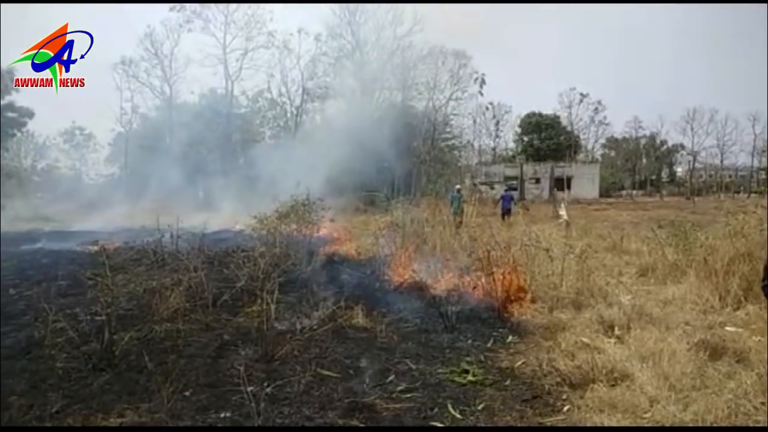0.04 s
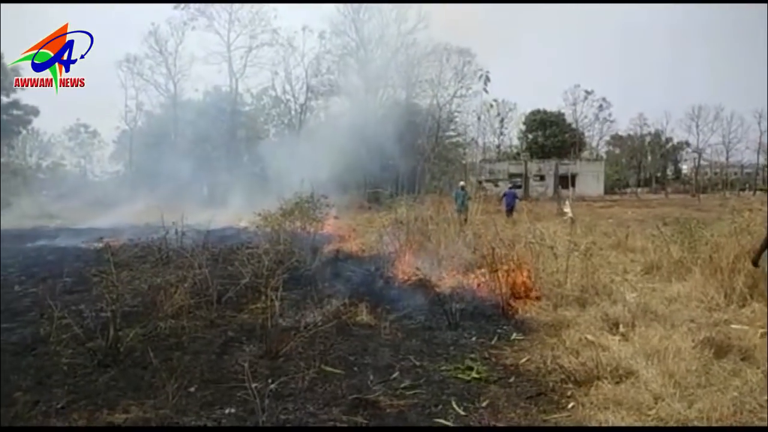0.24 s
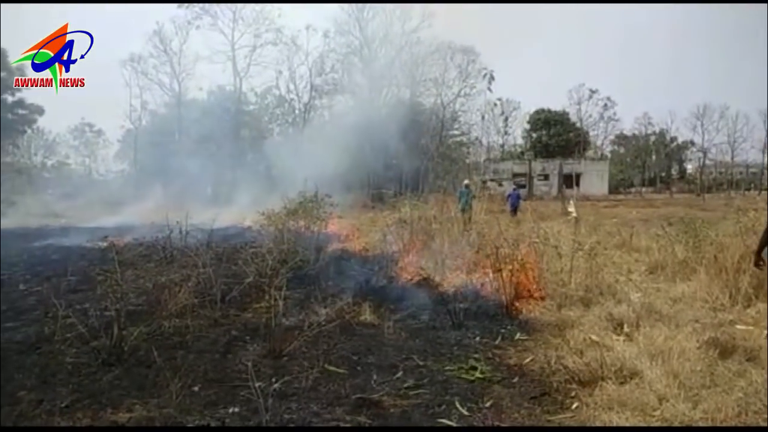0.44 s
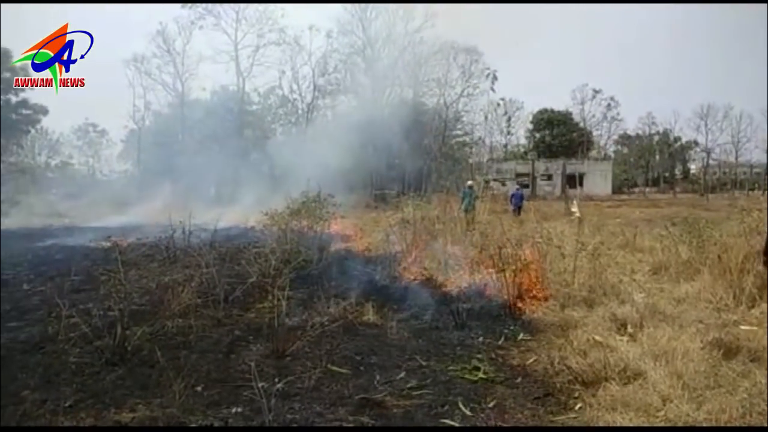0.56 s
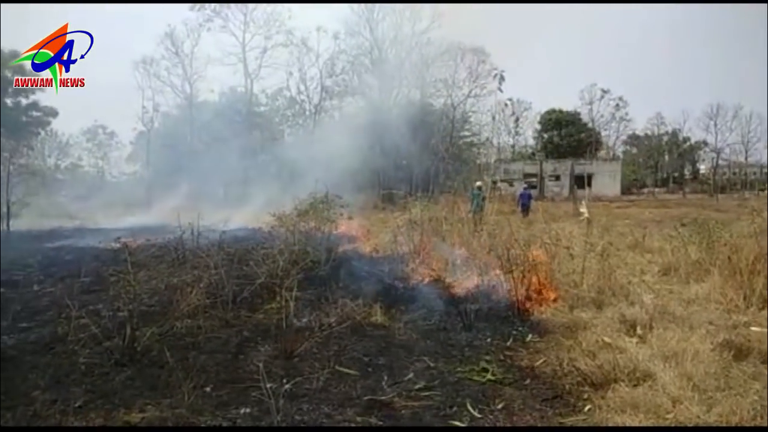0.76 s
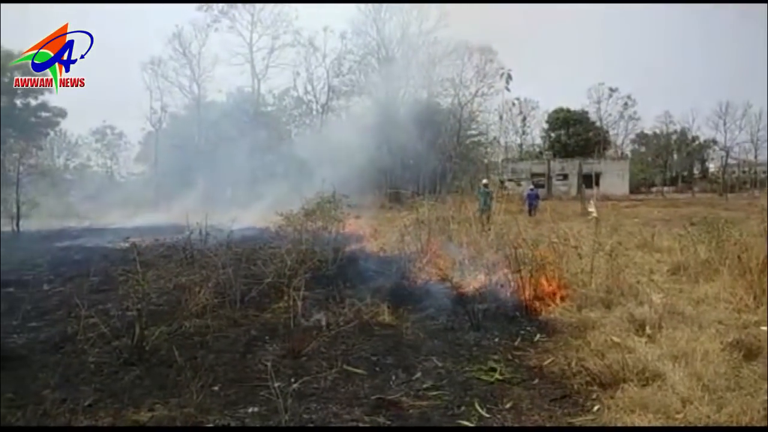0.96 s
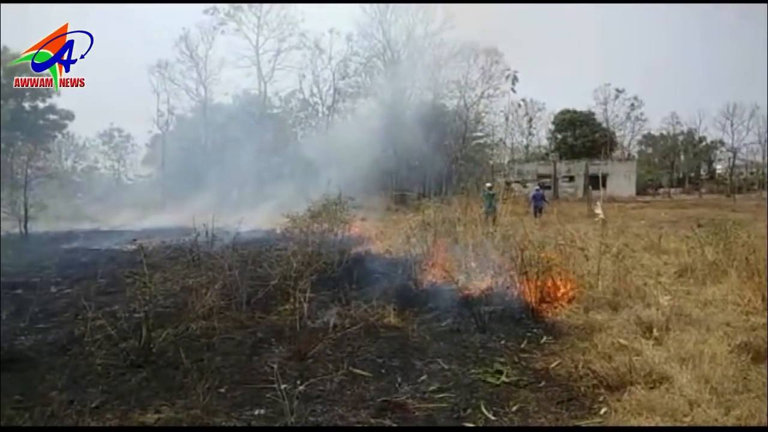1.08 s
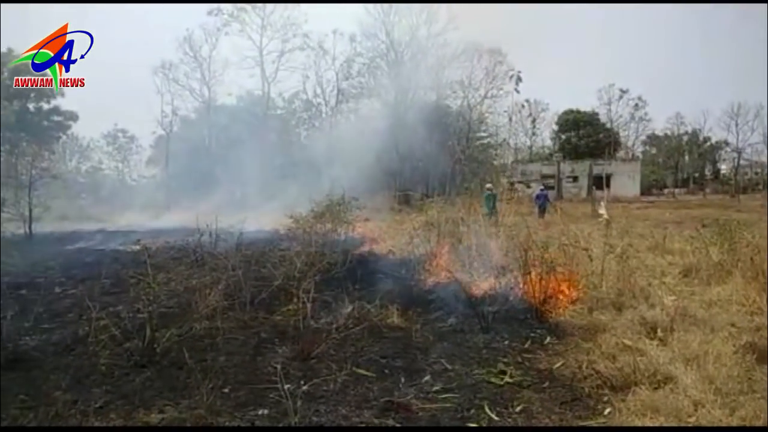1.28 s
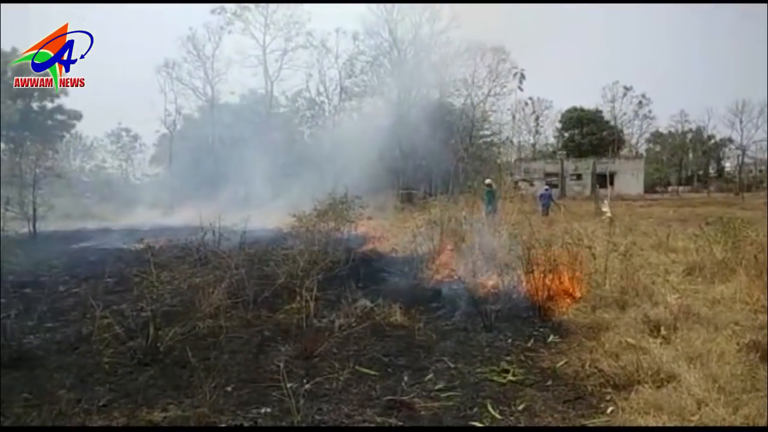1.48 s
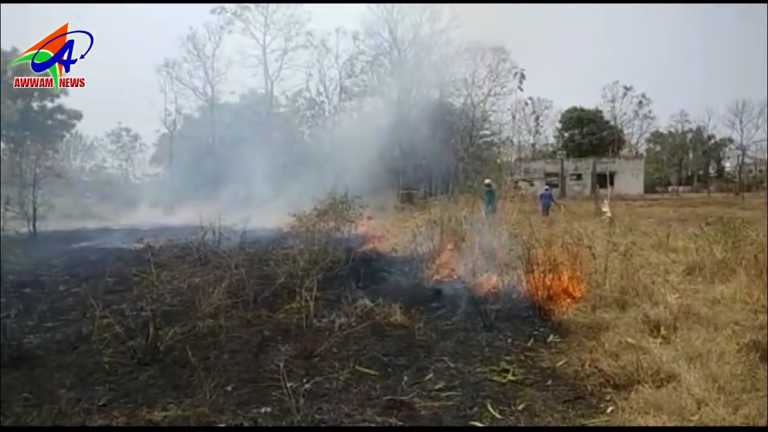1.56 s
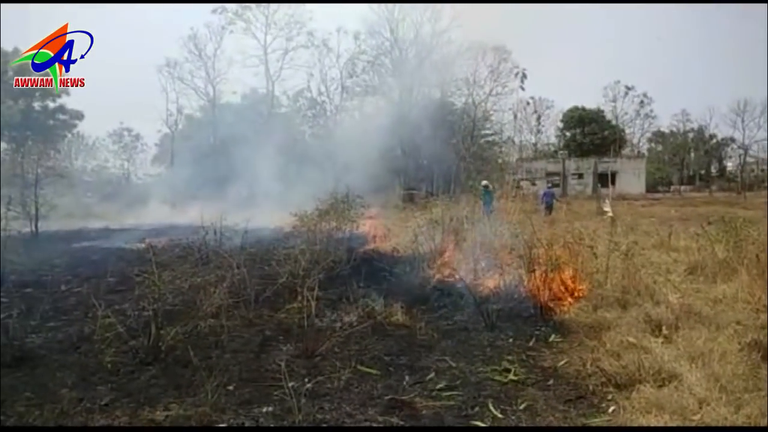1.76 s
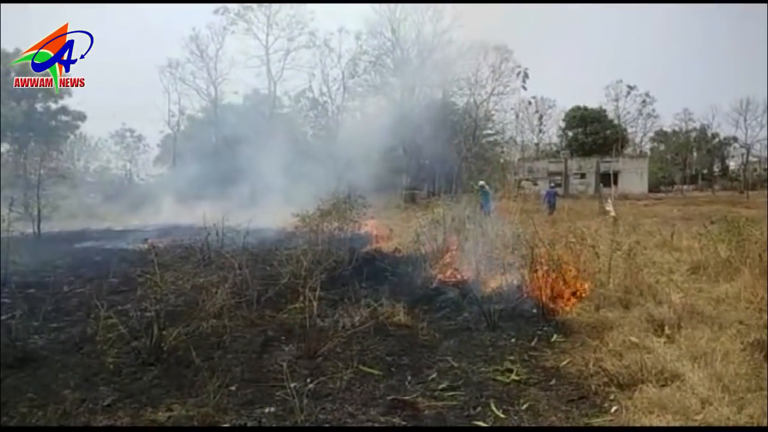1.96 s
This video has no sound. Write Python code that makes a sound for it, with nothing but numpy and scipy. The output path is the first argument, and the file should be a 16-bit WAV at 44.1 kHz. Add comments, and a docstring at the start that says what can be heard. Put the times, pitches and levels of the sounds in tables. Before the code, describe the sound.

Dry grass and brush burn a few metres ahead, slightly right: continuous crisp crackling, stalks snapping in uneven clusters, strongest in the later part, with soft flames and low wind thumps at the microphones outdoors.

```python
"""A dense crackle of fine blades over the soft rush of flames is heard first: dry grass and brush burn in
an open field, a few metres ahead and slightly to the right. Filtered noise makes the rush and random ticks
the crackle. Light wind, as separate noise at each of two microphone ports, drifts and buffets. Stalks burst
in sharp pops, each a decaying noise snap with after-snaps and a short scatter off the stubble."""
import sys
import numpy as np
from scipy import signal
from scipy.fft import rfft, irfft, next_fast_len
from scipy.io import wavfile

SR = 44100
rng = np.random.default_rng(int(sys.argv[2]) if len(sys.argv) > 2 else 0)


def digitize_waveform(pressure):
    """Quantize a signal to 16-bit integers and store it at the path in sys.argv[1].

    Rows of a 2-D input are taken as channels; values are limited to [-1, 1].
    """
    field = np.atleast_2d(pressure).T
    bounded = np.clip(field, -1, 1)
    quanta = np.round(bounded * 32767).astype(np.int16)
    wavfile.write(sys.argv[1], SR, quanta)


N = 89302  # length in samples


def undb(db):
    """Logarithmic level: decibels to amplitude gain."""
    return 10 ** (np.asarray(db) / 20)


def unit(x):
    """Mean-square normalisation: scale to rms 1."""
    return x / np.sqrt(np.mean(x ** 2))


def curve(rows):
    """Amplitude envelope: gain over time, linear in dB between (t/s, level/dB) points."""
    return undb(np.interp(np.arange(N) / SR, *np.array(rows).T))


def colour(x, points):
    """Minimum-phase filtering: a causal filter through (f/Hz, level/dB) points, by folding the cepstrum."""
    n = next_fast_len(x.shape[-1] + 2048) // 2 * 2
    hz, db = np.array(points, float).T
    bins_hz = np.arange(n // 2 + 1) * SR / n
    gain = undb(np.interp(np.log(bins_hz + 1), np.log(hz), db))
    cepstrum = irfft(np.log(gain))
    cepstrum[1:n // 2] *= 2
    cepstrum[n // 2 + 1:] = 0
    response = np.exp(rfft(cepstrum))
    return irfft(rfft(x, n) * response)[..., :x.shape[-1]]


PORTS_HZ = 2780  # below this the two ports hear more and more alike


def apart(size):
    """Spatial coherence: how differently the ports hear each frequency, 0 at zero f, 1 in the treble."""
    return np.minimum(np.arange(size // 2 + 1) * SR / size / PORTS_HZ, 1)


def diffuse(size):
    """Diffuse field: noise from all around, alike at both ports in the bass, unrelated in the treble."""
    mid, side = rfft(rng.standard_normal((2, size)))
    return irfft(mid + np.array([[1], [-1]]) * apart(size) * side, size) / np.sqrt(2)


LEAD = 128  # samples of room before each snap
SNAP_S = .00015  # decay of one snap
AFTER_S, AFTER_SPREAD_DB = .0025, 3  # span of the after-snaps, spread of their levels
SCATTER_S = .002  # decay of the scatter off the stubble
FIELD_S, FIELD_DB = .012, -37  # faint tail from the field: decay, gain on noise
LAG_S, LAG_SPREAD_S = .000099, .00003  # on average the right port hears the fire first
PORTS_STEEP = 6  # how abruptly the lag between the ports sets in with frequency
STALK_RIPPLE_DB, STALK_RIPPLE_HZ = 2.6, 340  # each stalk's own resonances: depth and spacing


def burst(after_db, scatter_db, pan_db, size=3072, count=3):
    """Impulsive fracture: a snap and after-snaps reach both ports, then scatter from all around."""
    t = (np.arange(size) - LEAD) / SR
    hz = np.arange(size // 2 + 1) * SR / size
    started = t >= 0
    snap = np.zeros(size)
    for k in range(count):
        crack = rng.standard_normal(size) * np.exp(-abs(t) / SNAP_S) * started
        crack /= np.linalg.norm(crack)
        delay_s = AFTER_S * (k - rng.random()) / (count - 1)
        db = after_db + AFTER_SPREAD_DB * rng.standard_normal()
        if k:  # the stalk splits further; the first snap has no delay and 0 dB
            crack = np.roll(crack, int(delay_s * SR)) * undb(db)
        snap += crack

    # the left port lags in the treble
    lag = LAG_S + LAG_SPREAD_S * rng.standard_normal()
    lags = apart(size) ** PORTS_STEEP * np.array([[lag], [0]])
    direct = rfft(snap) * np.exp(-2j * np.pi * hz * lags)

    scatter = undb(scatter_db) * np.exp(-abs(t) / SCATTER_S)
    field = undb(FIELD_DB) * np.exp(-abs(t) / FIELD_S)
    ripple = np.interp(hz / STALK_RIPPLE_HZ, np.arange(LEAD), rng.standard_normal(LEAD))
    tail = rfft(diffuse(size) * (scatter + field) * started)

    shade_db = pan_db * apart(size) * np.array([[.5], [-.5]])
    return irfft((direct + tail) * undb(STALK_RIPPLE_DB * ripple + shade_db))


# how hard the fire burns, before the flicker and the layer gains: t/s, level/dB
BLAZE = [(0, -42.5), (.08, -46), (.16, -42), (.3, -45), (.36, -46.5), (.49, -42.5), (.6, -47), (.88, -45.5),
         (.94, -41), (1.0, -49.5), (1.06, -45), (1.15, -40), (1.25, -45), (1.39, -40.5), (1.45, -42),
         (1.62, -45.5), (1.69, -42), (1.9, -38.5), (2.02, -43)]
# spectrum of ticks and sizzle before each is scaled to rms 1: f/Hz, level/dB
CRACKLE_COLOUR = [(400, -20), (700, -26.5), (1100, -17), (2100, -16), (2600, -11.5), (3150, -14.5),
                  (3900, -9), (4900, -11.5), (6300, -7), (7300, -8), (8500, -3), (9600, -0.5), (12000, -3),
                  (14100, -7.5), (14900, -67), (16000, -60)]
CRACKLE_PER_S, CRACKLE_SPREAD_DB = 1300, 5.0  # mean tick rate of all tufts, dB per unit of strength
BLADE_AFTER_DB, BLADE_SCATTER_DB = -11, -23  # thin blades: after-snaps re first snap, scatter gain
CRACKLE_PAN_DB, PAN_SPREAD_DB = -1, 10  # treble, left minus right: mean and spread from tuft to tuft
CRACKLE_DB, SIZZLE_DB = -1.5, -3.5  # whole layer re the blaze, sizzle re the ticks
FLICKER_PER_S, FLICKER_DB = 60, 2.5  # the flames lick unevenly


def crackle(count=32):
    """Random impulse process: blades tick in many tufts, mostly faint, over a sizzle; both follow the blaze."""
    ticking = np.zeros((2, N))
    for _ in range(count):
        chance = rng.random(N)
        strength = np.minimum(rng.exponential(size=N), 3.6)
        ticks = (chance < CRACKLE_PER_S / count / SR) * undb(CRACKLE_SPREAD_DB * strength)
        pan_db = CRACKLE_PAN_DB + PAN_SPREAD_DB * rng.standard_normal()
        blade = unit(burst(BLADE_AFTER_DB, BLADE_SCATTER_DB, pan_db))
        ticking += signal.fftconvolve(ticks[None], blade, axes=1)[:, :N]
    ticking = unit(colour(ticking, CRACKLE_COLOUR))
    sizzle = unit(colour(diffuse(N), CRACKLE_COLOUR))
    licks = np.interp(np.arange(N) / SR * FLICKER_PER_S, np.arange(N), rng.standard_normal(N))
    level = curve(BLAZE) * undb(FLICKER_DB * licks) * undb(CRACKLE_DB)
    return level * (ticking + undb(SIZZLE_DB) * sizzle)


# spectrum of the rush before scaling to rms 1: f/Hz, level/dB
RUSH_COLOUR = [(40, -35), (110, -1.5), (200, 2.5), (300, -1.5), (420, -9), (680, -6.5), (1000, -14.5),
               (1500, -15), (2100, -8), (3000, -29.5), (6000, -33)]
# level of the rush: t/s, level/dB
RUSH_DB = [(0, -59), (.7, -58), (1.2, -55.5), (1.6, -54.5), (2.02, -54.5)]


def flames():
    """Broadband combustion noise: the soft rush of the flames, a coloured diffuse field swelling slowly."""
    return curve(RUSH_DB) * unit(colour(diffuse(N), RUSH_COLOUR))


# spectrum of the breeze before scaling to rms 1: f/Hz, level/dB
WIND_COLOUR = [(25, -72), (52, -12), (75, -15), (110, 3.5), (185, -3.5), (250, -13), (350, -25),
               (600, -25.5), (2000, -30)]
# breeze before the two ports are balanced: t/s, level/dB
BREEZE_DB = [(0, -59), (.8, -57.5), (.95, -47), (1.25, -60), (1.5, -47), (1.8, -48.5), (2.02, -47)]
BREEZE_LEFT_DB = -8.5  # gain at the left port; the right has 0 dB


def breeze():
    """Turbulent pressure noise: eddies of a light breeze, independent at each port."""
    eddies = unit(colour(rng.standard_normal((2, N)), WIND_COLOUR))
    return eddies * curve(BREEZE_DB) * undb([[BREEZE_LEFT_DB], [0]])


# wind buffets: centre t/s, length (fall to exp(-2)) t/s, left level/dB, right level/dB
BUFFETS = [(0.043, 0.0067, -72, -31), (0.15, 0.02, -68, -46), (0.291, 0.0043, -49, -31),
           (0.35, 0.022, -46, -78), (0.461, 0.017, -37, -37.5), (0.499, 0.01, -38, -57),
           (0.893, 0.054, -62, -52), (1.123, 0.041, -45.5, -63), (1.394, 0.031, -68, -41),
           (1.54, 0.012, -38.5, -43), (1.705, 0.022, -72, -30.5), (1.912, 0.053, -51, -48),
           (1.994, 0.038, -79, -47.5)]
# spectrum of a buffet before scaling to its level: f/Hz, level/dB
BUFFET_COLOUR = [(25, -24), (55, -28.5), (85, -12), (125, 0.5), (185, 1), (240, -8), (330, -20),
                 (600, -48.5), (2000, -72)]


def buffets():
    """Turbulent gusts: Gaussian swells of low eddy noise, independent at each port."""
    t = np.arange(N) / SR
    out = np.zeros((2, N))
    eddies = rng.standard_normal((2, N))
    for at, length, left_db, right_db in BUFFETS:
        swell = np.exp(-2 * ((t - at) / length) ** 2)
        puff = colour(eddies * swell, BUFFET_COLOUR)
        # give each port the energy of the swell itself
        puff *= np.sqrt(np.sum(swell ** 2) / np.sum(puff ** 2, axis=1, keepdims=True))
        out += puff * undb([[left_db], [right_db]])
    return out


# bands in which a pop's level is set, top to low: lower edge f/Hz, upper edge f/Hz
POP_BANDS = [(10000, 16000), (6000, 10000), (3000, 6000), (1150, 3000), (380, 1150)]
POP_S = .0065  # span over which a pop's level is averaged


def voiced(pop, levels, count=3):
    """Spectral equalisation: tilt a pop smoothly, in repeated steps, towards its level in each band."""
    size = pop.shape[1]
    hz = np.arange(size // 2 + 1) * SR / size
    centres = np.sqrt(np.prod(POP_BANDS, axis=1))
    for _ in range(count):
        power = np.sum(abs(rfft(pop)) ** 2, axis=0) / (size * POP_S * SR)
        held = 10 * np.log10([power[(hz >= lo) & (hz < hi)].sum() for lo, hi in POP_BANDS])
        pop = colour(pop, sorted(zip(centres, levels - held)))
    return pop


# pops of bursting stalks, a close pair of rows being one stalk snapping twice; band levels before the trim:
# t/s, top level/dB, treble level/dB, upper-mid level/dB, # mid level/dB, low level/dB, left minus right
# level/dB (in full only in the treble)
POPS = [(0.0577, -41, -43, -51, -67, -66, 0), (0.1048, -41, -40, -49, -60, -65, -2),
        (0.1193, -42, -42, -55, -71, -74, -1), (0.1527, -40, -39, -46, -47, -53, -2),
        (0.1555, -45, -39, -45, -53, -60, -3), (0.1631, -43, -43, -50, -57, -74, -2),
        (0.1792, -35, -38, -44, -57, -60, -3), (0.2016, -40, -40, -51, -67, -63, -2),
        (0.2123, -41, -41, -57, -70, -68, -1), (0.2191, -33, -36, -56, -69, -73, -2),
        (0.2292, -45, -35, -41, -48, -52, -4), (0.2386, -51, -48, -58, -58, -65, -1),
        (0.253, -32, -32, -37, -43, -53, -3), (0.2705, -42, -38, -45, -54, -65, 0),
        (0.3292, -44, -45, -56, -60, -77, 1), (0.3877, -45, -43, -48, -57, -75, -1),
        (0.3986, -46, -47, -54, -61, -61, 0), (0.4173, -42, -40, -52, -63, -69, -1),
        (0.4294, -36, -37, -50, -51, -54, 1), (0.4514, -36, -36, -45, -55, -59, -2),
        (0.4577, -41, -37, -48, -55, -58, -3), (0.4585, -39, -35, -46, -53, -56, -3),
        (0.4811, -34, -39, -46, -59, -73, -1), (0.4995, -34, -36, -40, -52, -54, 1),
        (0.6338, -44, -44, -52, -58, -66, 1), (0.6672, -39, -35, -48, -61, -75, -4),
        (0.7198, -39, -35, -49, -46, -54, -3), (0.7439, -41, -44, -56, -70, -61, -2),
        (0.7667, -44, -42, -48, -52, -64, -3), (0.8257, -42, -41, -45, -55, -71, -1),
        (0.8655, -41, -43, -56, -71, -73, -4), (0.8787, -47, -51, -53, -53, -56, -1),
        (0.9155, -37, -37, -48, -49, -47, -2), (0.946, -40, -37, -53, -63, -69, -2),
        (1.024, -38, -38, -48, -58, -72, -2), (1.0525, -39, -39, -53, -61, -67, -2),
        (1.0867, -36, -41, -51, -67, -67, 1), (1.0875, -34, -39, -49, -65, -65, 1),
        (1.1135, -43, -42, -55, -57, -58, 0), (1.1327, -46, -47, -48, -53, -55, -1),
        (1.1389, -50, -44, -51, -56, -68, -1), (1.1452, -47, -43, -54, -58, -70, -3),
        (1.1721, -49, -45, -48, -59, -72, -2), (1.2027, -38, -36, -43, -42, -50, -3),
        (1.2258, -42, -44, -61, -62, -69, 0), (1.2559, -43, -40, -43, -49, -65, -1),
        (1.2791, -43, -43, -52, -59, -62, -2), (1.3011, -36, -36, -48, -52, -65, -4),
        (1.3054, -41, -41, -53, -60, -71, -1), (1.3184, -33, -36, -44, -62, -59, -2),
        (1.3547, -40, -40, -57, -60, -73, -3), (1.3619, -41, -44, -51, -59, -55, 0),
        (1.4793, -40, -41, -41, -47, -50, -2), (1.485, -34, -32, -42, -48, -59, -4),
        (1.4861, -29, -27, -37, -43, -54, -4), (1.5657, -31, -30, -34, -43, -61, -1),
        (1.5675, -33, -32, -36, -45, -63, -1), (1.5714, -48, -39, -49, -66, -72, -3),
        (1.5931, -35, -39, -44, -49, -55, 0), (1.6081, -31, -27, -32, -39, -49, 0),
        (1.6099, -32, -28, -33, -40, -50, 0), (1.6145, -39, -35, -37, -48, -60, -3),
        (1.6474, -30, -35, -41, -46, -57, -3), (1.7352, -38, -39, -48, -66, -58, -3),
        (1.7476, -37, -39, -49, -63, -70, 1), (1.8106, -36, -35, -43, -54, -69, -1),
        (1.8204, -39, -41, -52, -57, -64, -2), (1.8595, -40, -42, -50, -54, -69, 0),
        (1.8843, -37, -39, -60, -62, -61, -3), (1.927, -40, -40, -55, -66, -68, -1),
        (1.9572, -36, -38, -51, -55, -57, -1), (1.9697, -46, -44, -50, -50, -43, -2),
        (1.9743, -38, -34, -43, -53, -60, -1)]
# trim added to each band, top to low: level/dB
POP_TRIM_DB = [0, 0.3, 1, 1, 1]
# fine spectrum of a pop before its bands are set: f/Hz, level/dB
POP_COLOUR = [(100, -38), (400, -16), (730, -3), (1100, -16.5), (1400, -9), (1700, -16), (2050, -5),
              (2350, -15.5), (2700, -4), (3050, -14.5), (4000, -6), (4650, -7), (5150, -6.5), (5600, 2),
              (6100, -3.5), (8600, 6), (10000, 7.5), (11800, 5.5), (13600, 7.5), (14900, -12), (15500, -36)]
AFTER_DB, SCATTER_DB = -11, -22  # after-snaps re first snap, scatter gain on noise


def pops():
    """Impulsive radiation: near stalks burst, each row a pop with its own spectral balance; a thick stalk may
    snap twice in quick succession, as two close rows."""
    out = np.zeros((2, N + SR))
    for at, *levels, pan_db in POPS:
        pop = colour(burst(AFTER_DB, SCATTER_DB, pan_db), POP_COLOUR)
        pop = voiced(pop, np.add(levels, POP_TRIM_DB))
        start = max(int(at * SR) - LEAD, 0)
        out[:, start:start + pop.shape[1]] += pop
    return out[:, :N]


def scene():
    """Linear superposition: fire and wind together."""
    return pops() + crackle() + flames() + breeze() + buffets()


TOP_HZ = 15400  # upper limit of the recorder


def record(dry):
    """Band limitation: the recorder cuts the top with a steep elliptic low-pass."""
    return signal.sosfilt(signal.ellip(8, .2, 80, TOP_HZ, fs=SR, output="sos"), dry)


dry = scene()
out = record(dry)
digitize_waveform(out)
```